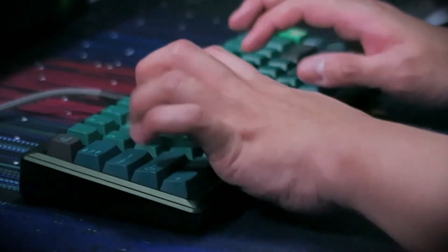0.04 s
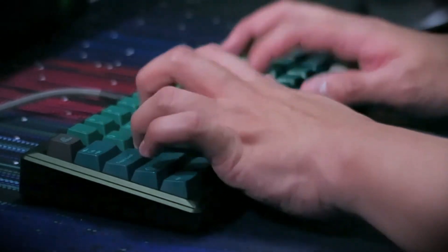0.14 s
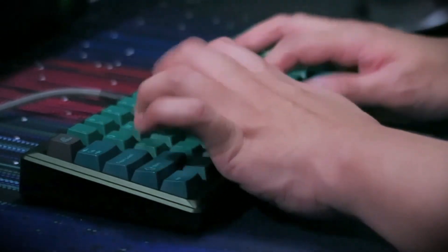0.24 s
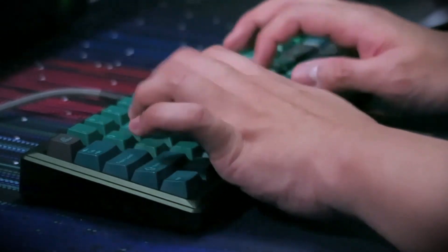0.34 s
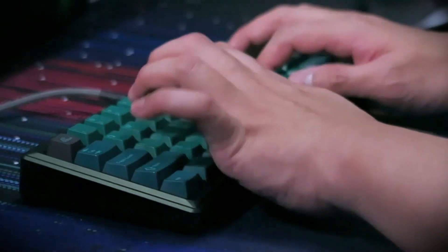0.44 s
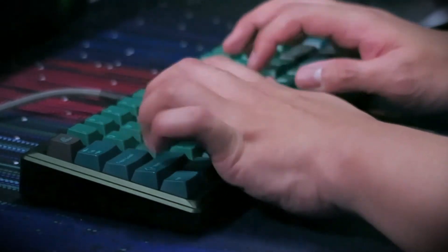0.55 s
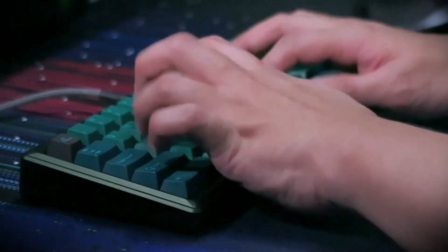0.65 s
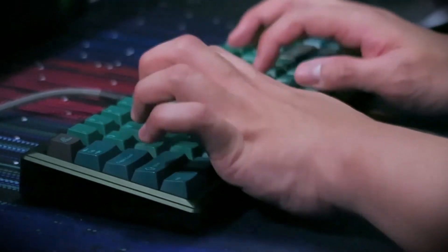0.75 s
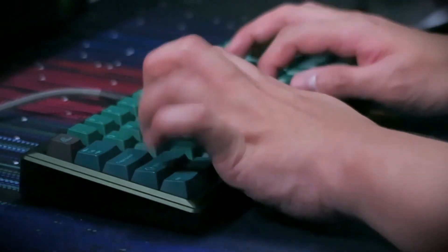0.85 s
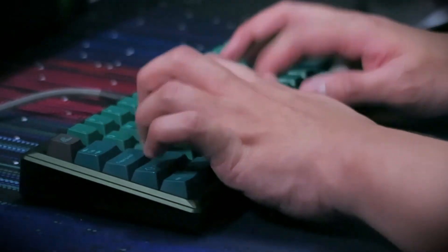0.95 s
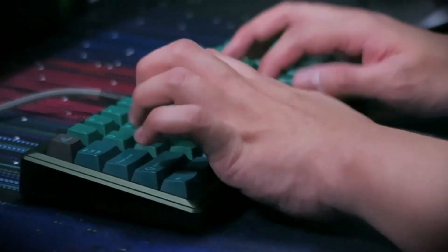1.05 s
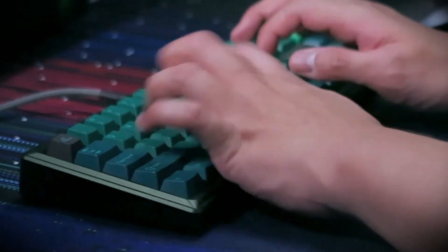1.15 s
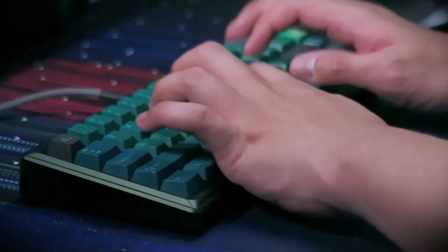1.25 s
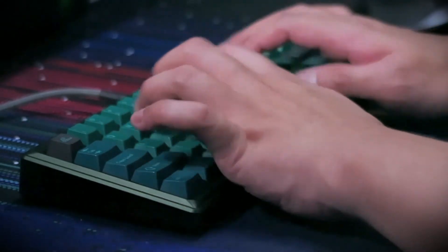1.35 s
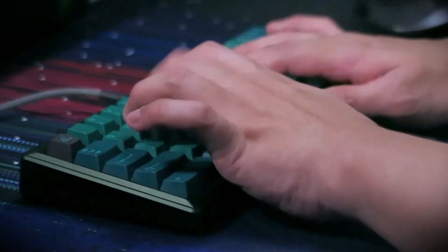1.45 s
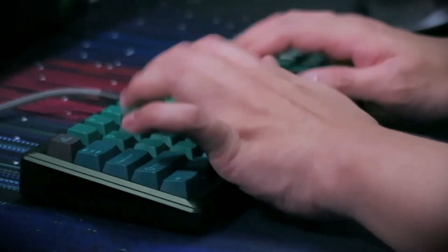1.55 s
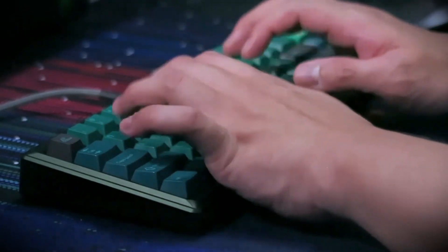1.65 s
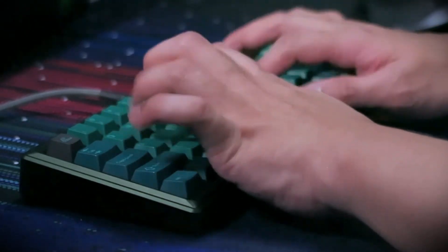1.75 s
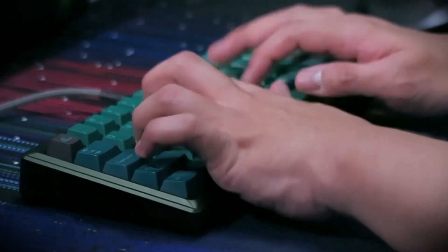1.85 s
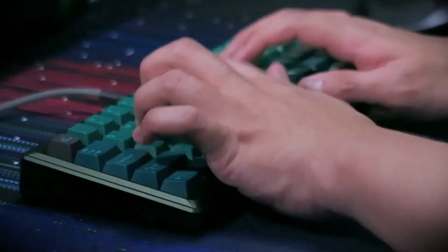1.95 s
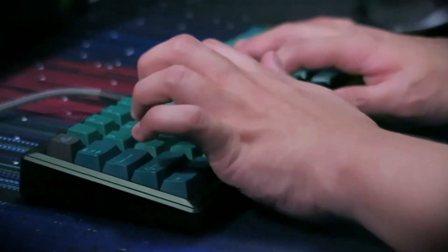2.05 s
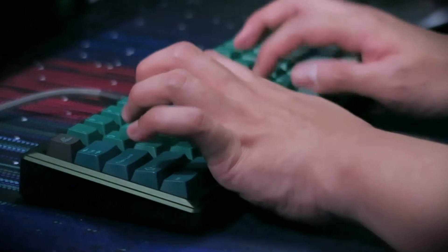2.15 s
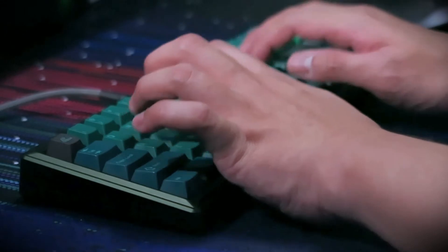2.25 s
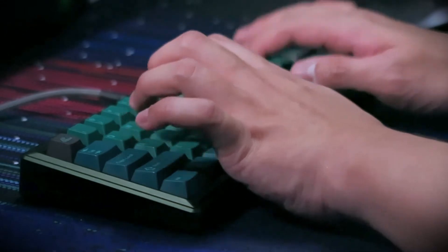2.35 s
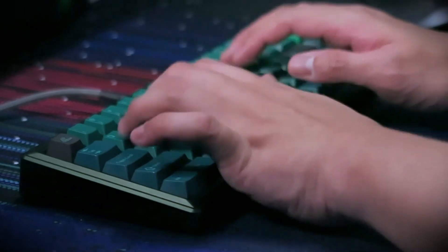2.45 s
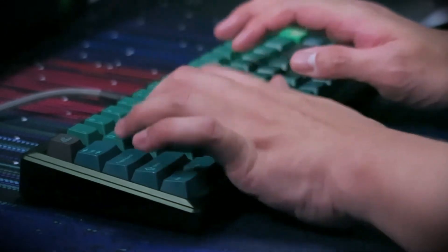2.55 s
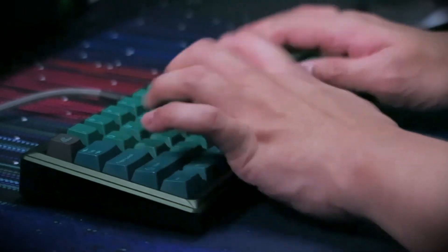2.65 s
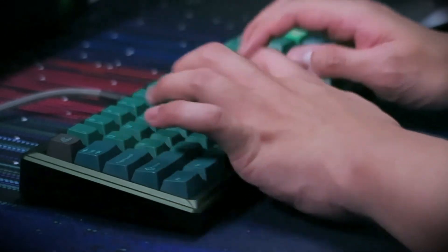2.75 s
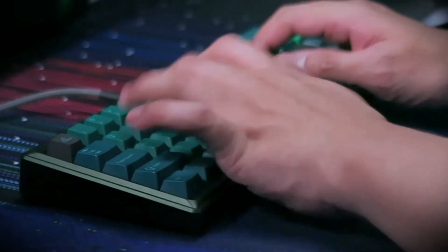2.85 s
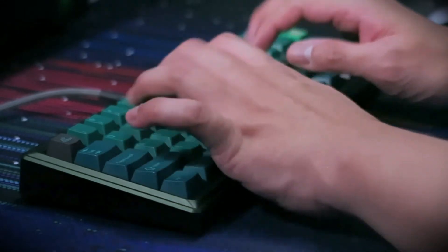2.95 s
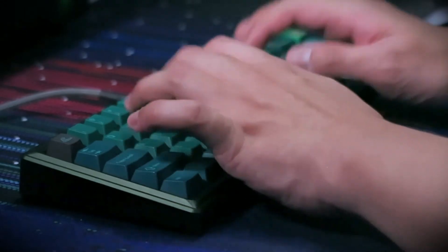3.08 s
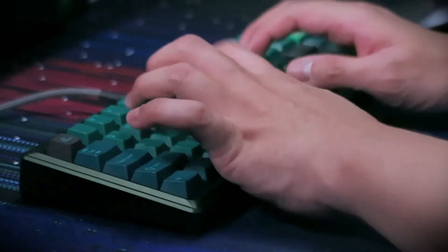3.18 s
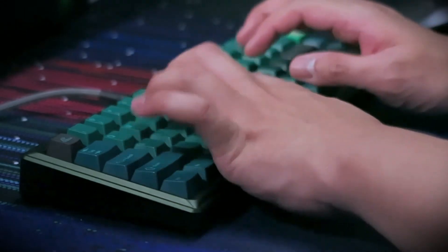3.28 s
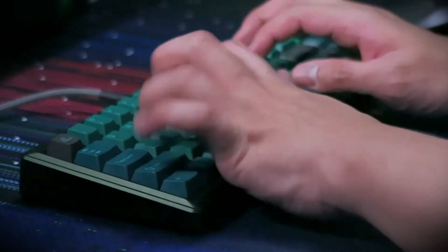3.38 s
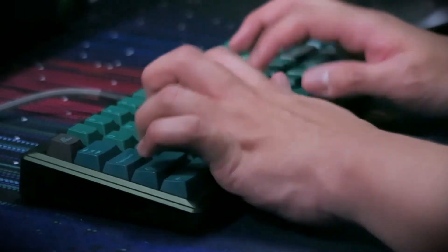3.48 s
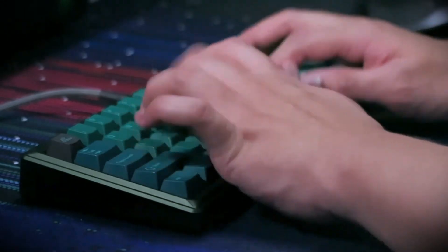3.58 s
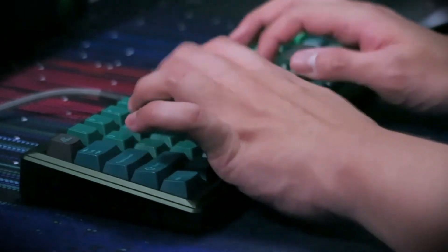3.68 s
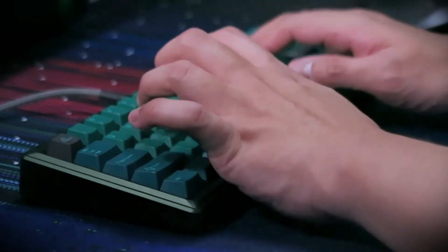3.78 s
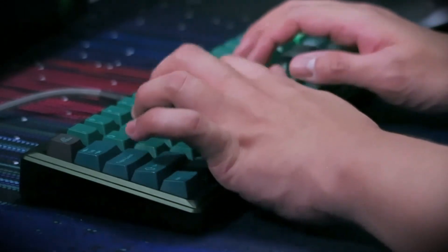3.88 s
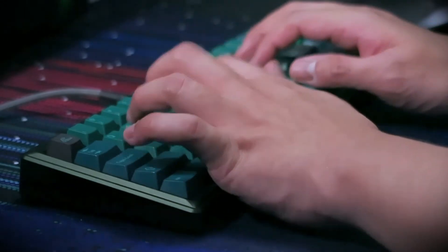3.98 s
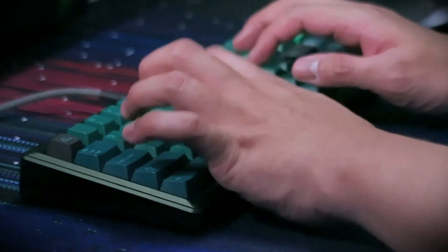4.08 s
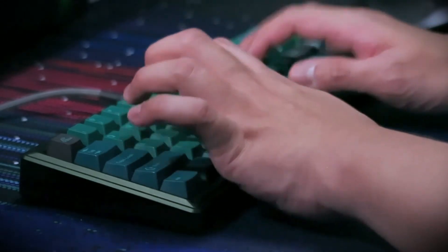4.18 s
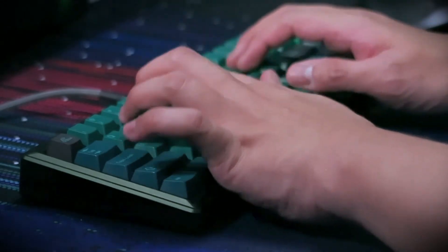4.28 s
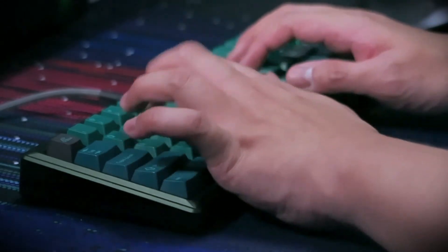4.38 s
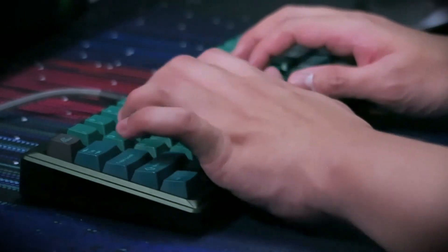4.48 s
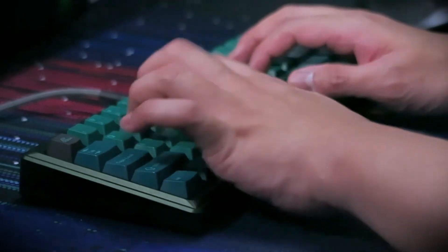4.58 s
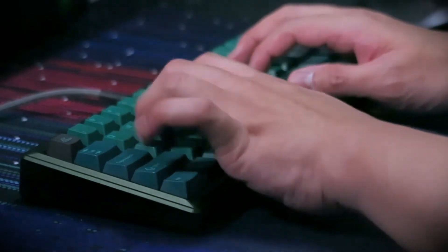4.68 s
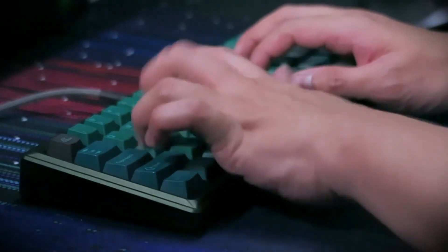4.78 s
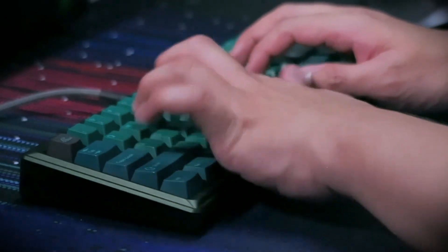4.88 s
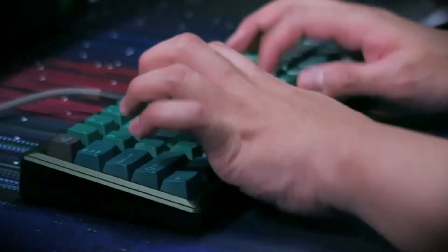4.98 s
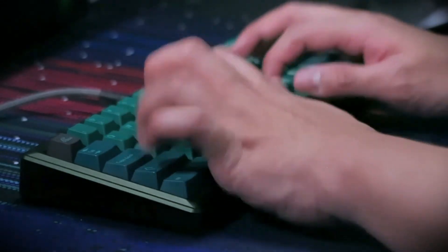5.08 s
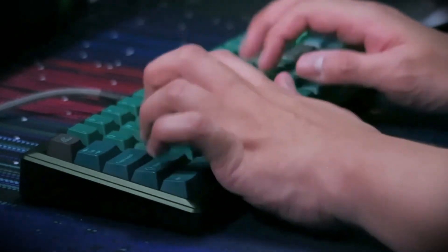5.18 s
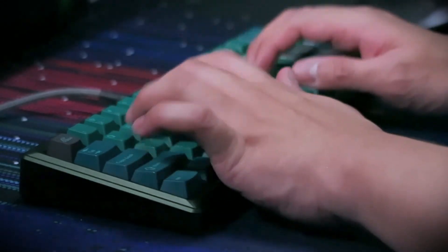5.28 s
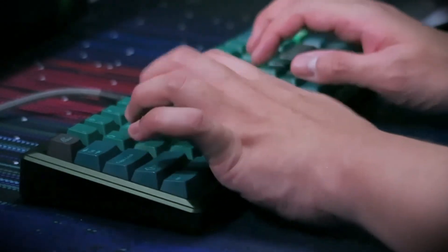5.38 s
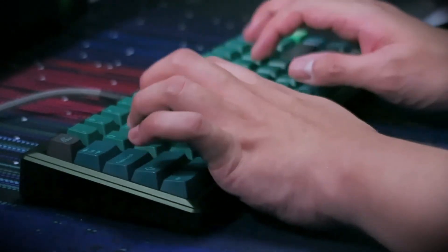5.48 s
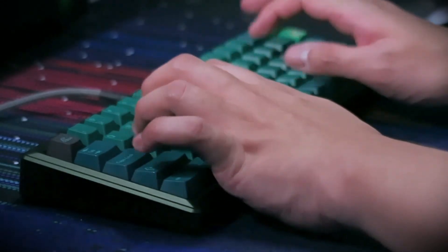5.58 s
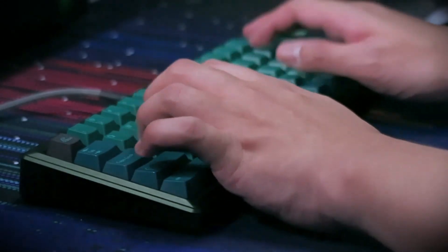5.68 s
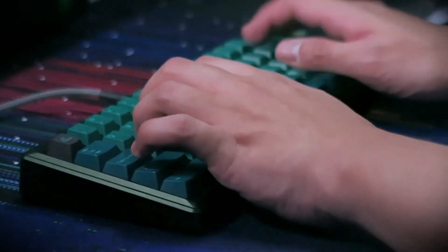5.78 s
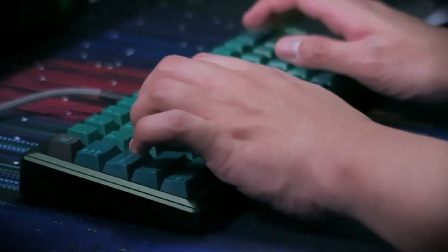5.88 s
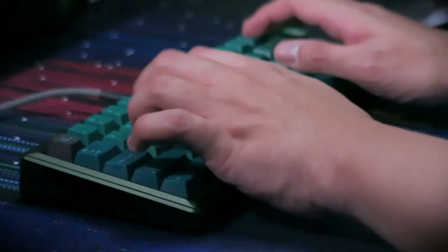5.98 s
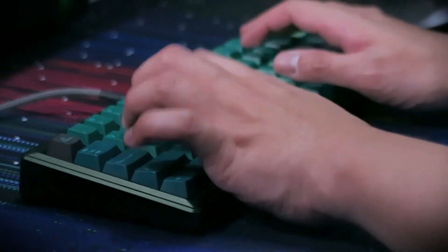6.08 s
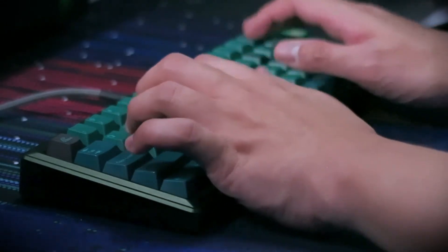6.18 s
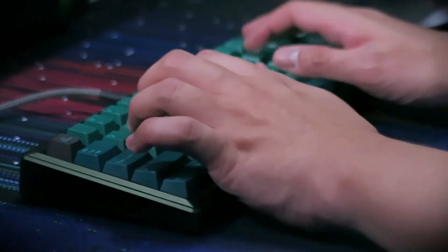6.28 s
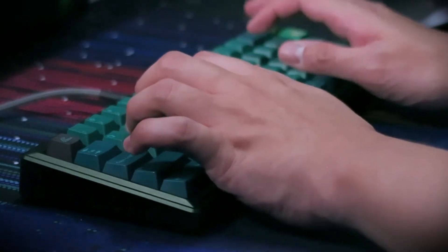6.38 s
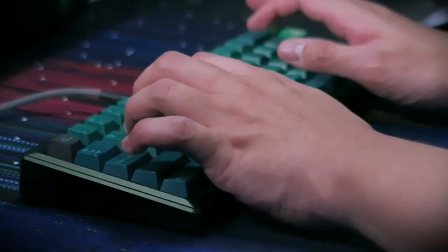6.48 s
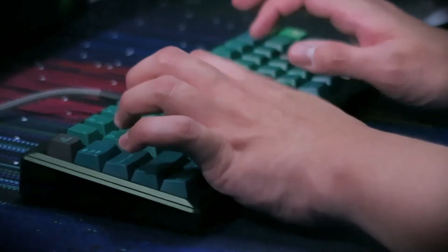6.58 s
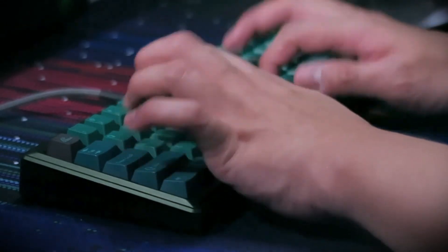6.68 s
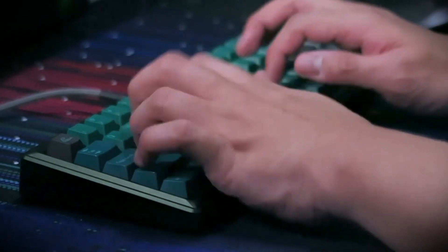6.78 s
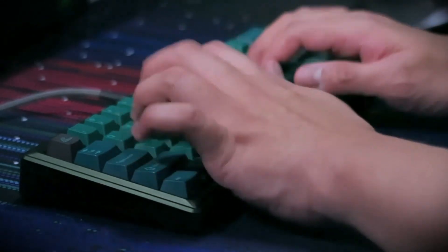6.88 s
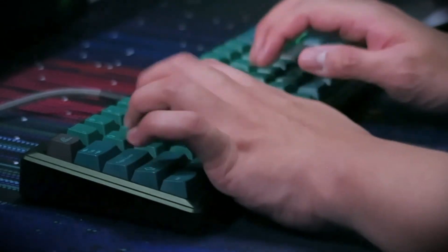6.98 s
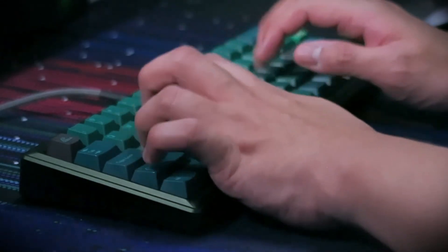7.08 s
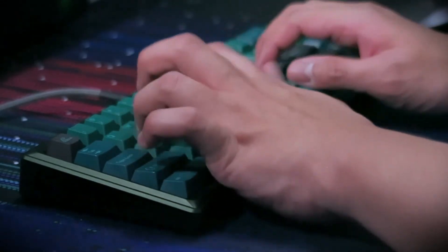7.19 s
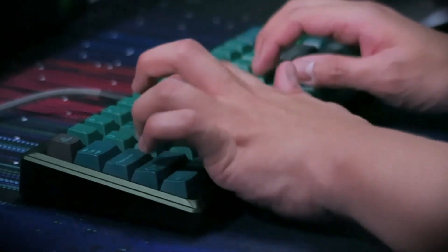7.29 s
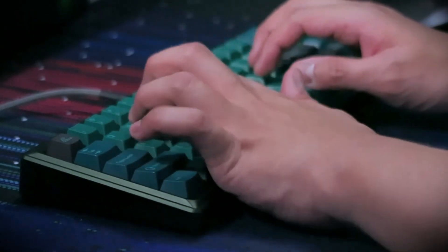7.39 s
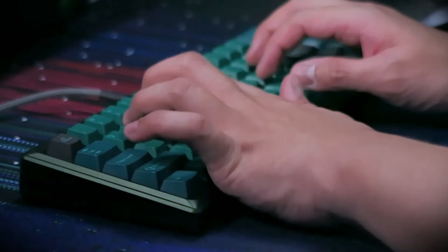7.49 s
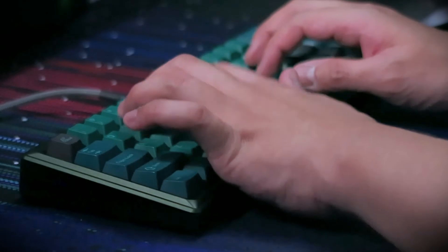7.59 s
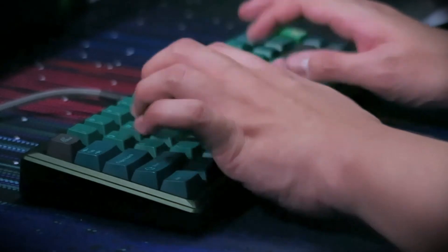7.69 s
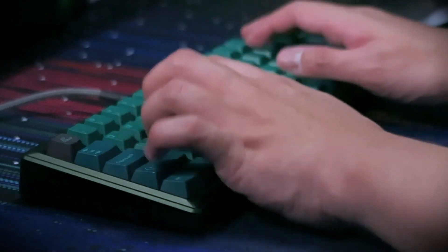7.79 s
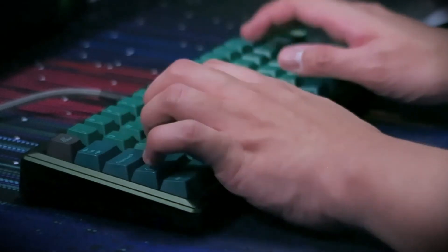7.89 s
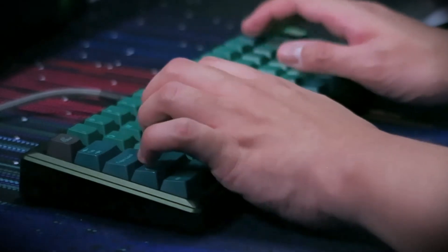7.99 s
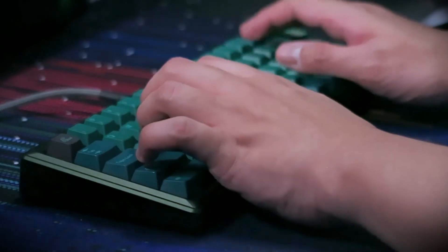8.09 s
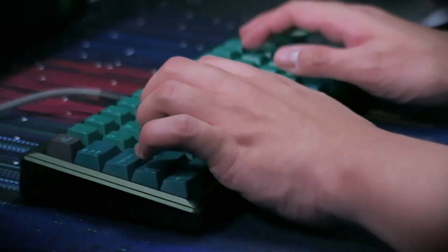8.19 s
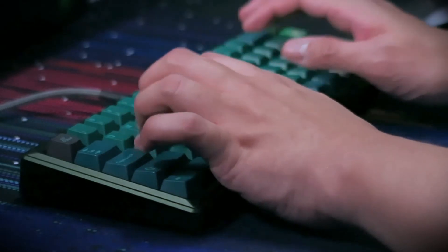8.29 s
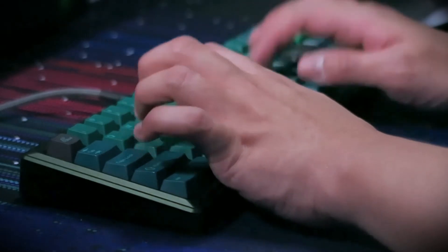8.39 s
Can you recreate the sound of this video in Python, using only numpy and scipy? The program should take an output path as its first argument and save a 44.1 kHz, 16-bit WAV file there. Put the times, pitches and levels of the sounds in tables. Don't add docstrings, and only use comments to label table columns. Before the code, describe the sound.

Quick hands type on a compact keyboard on a desk mat, each stroke a short, dry, bright clack with tiny rattles and slight desk thud. The long thumb bar sounds hollower. After a steady flurry, a wide key is tapped several times, a short burst returns, then sparse taps, a soft scuff and a final clack. Low fan hum and short room reflections stay faint behind.

```python
import sys
import numpy as np
from scipy import signal
from scipy.fft import rfft, irfft
from scipy.io import wavfile
from scipy.ndimage import uniform_filter1d

SR = 44100
rng = np.random.default_rng(int(sys.argv[2]) if len(sys.argv) > 2 else 0)


def unload_audio(sound):
    columns = np.transpose(np.atleast_2d(sound))
    steps = np.round(np.clip(columns, -1, 1) * 32767)
    wavfile.write(sys.argv[1], SR, steps.astype(np.int16))


def invert_db(level):
    return 10 ** (np.asarray(level, dtype=float) / 20)


N = 372204

# pitch_hz, level_db
STEM_COLOUR = [(3200, -21.5), (4200, -1.5), (5000, -0.5), (6500, -2.5), (7600, -4), (8800, -4.5),
               (10800, -1), (12500, -4.5), (14200, -17), (15400, -15.5), (16800, -33.5)]
STEM_T60_S = 0.0051
CAP_RADIATES_HZ, BOARD_RADIATES_HZ = 1876, 1260


def firm_contacts():
    # start_s, cap_db, cap_hz, stem_db re cap
    letters = [(.2272, -21, 2460, -5), (.3144, -22.5, 2860, -4), (.4444, -21, 2250, -13.5),
               (.5434, -18.5, 2400, -4), (.6602, -19, 2680, -1.5), (.8535, -20, 2620, -10.5),
               (.918, -19, 2330, -13), (1.0163, -25.5, 2580, 0), (1.2365, -21.5, 2720, -8),
               (1.4707, -24.5, 2620, -13.5), (1.878, -20.5, 2400, -13.5), (2.2507, -20.5, 2720, -11),
               (2.6828, -23.5, 2700, -10.5), (2.851, -26.5, 2940, -9.5), (3.307, -21.5, 2870, -11),
               (3.4685, -19, 2280, -11.5), (3.5731, -20.5, 2480, -1), (3.6358, -20.5, 2710, -4),
               (3.781, -21.5, 2740, -4.5), (3.9094, -23, 2600, -4), (4.229, -19, 2650, -5.5),
               (4.775, -22.5, 2300, -13), (4.9003, -16, 2510, -9.5), (5.0631, -24, 2670, -7),
               (5.1511, -15, 2270, -14.5), (5.2675, -24, 2955, -10.5), (6.7311, -19, 2890, -8.5),
               (6.9017, -22.5, 2820, -9.5), (6.9745, -25.5, 2600, -12.5)]
    # start_s, cap_db, cap_hz, stem_db re cap
    braced = [(.1374, -25, 2130, -15), (1.3292, -20, 2590, -4.5), (1.3827, -36.5, 2380, -9),
              (1.6482, -20.5, 2540, -11), (1.771, -18.5, 2420, -6), (1.8378, -16.5, 2330, -14),
              (1.928, -36.5, 2280, -20.5), (2.042, -25, 2720, -9), (2.3935, -28.5, 2760, -12),
              (2.9004, -22.5, 2650, -11.5), (3.0876, -34.5, 2480, -17), (3.1394, -21, 2530, -10.5),
              (4.3024, -18.5, 2770, -7.5), (4.355, -30, 2370, -13), (4.4358, -34.5, 2720, -8),
              (4.5104, -34.5, 2700, -9.5), (4.9646, -34, 2520, -12), (5.2222, -34, 2050, -10.5),
              (5.3248, -17, 2580, -14), (6.817, -14, 2280, -15), (7.025, -27.5, 2450, -34),
              (7.1432, -37.5, 2100, -11), (7.1566, -24.5, 2740, -6), (7.5185, -25, 2400, -13.5),
              (7.623, -37.5, 2210, -18), (7.6676, -38, 2265, -10.5), (8.4321, -23.5, 3030, -4)]
    # start_s, cap_db, cap_hz, stem_db re cap
    thumb_bar = [(.0363, -20.5, 2500, -12.5), (.414, -24.5, 2440, -13.5), (.7452, -21, 2310, -13),
                 (1.1146, -20, 2430, -17), (2.17, -17, 2600, -13.5), (2.7394, -20.5, 2670, -5),
                 (3.2063, -17.5, 2500, -14), (4.113, -24.5, 2400, -16.5), (6.6318, -16.5, 2450, -11),
                 (7.0378, -19, 2430, -13)]
    # start_s, cap_db, cap_hz, stem_db re cap
    corner = [(5.696, -21.5, 2860, 4), (5.827, -25, 2740, -2.5), (5.8903, -40, 2950, -2),
              (5.9582, -26, 2770, -2.5), (6.11, -40, 2950, -10), (6.1214, -28.5, 1920, -18),
              (6.1588, -30.5, 2730, -3), (6.1802, -34.5, 2800, 2), (6.2949, -30.5, 2650, -5.5),
              (7.8089, -23, 2650, 0), (7.9406, -29.5, 2680, -4.5), (8.187, -30.5, 2620, -4.5)]
    # start_s, cap_db, cap_hz, stem_db re cap
    snaps = [(.382, -38.5, 2600, -6), (.5182, -37.5, 2240, -9.5), (.7226, -35, 2080, -6),
             (1.5682, -34, 2480, -5.5), (1.7108, -25, 2660, -14.5), (1.9601, -32.5, 2540, -9.5),
             (2.6414, -34.5, 2300, -6.5), (2.811, -37, 2180, -12), (2.9248, -43, 2910, -16),
             (3.3785, -31, 2550, -5), (3.7081, -35.5, 2800, -6), (4.6366, -32.5, 2370, -10),
             (4.702, -35, 2520, -37), (4.8027, -39, 2300, -5), (5.1332, -41, 2250, -10),
             (6.7983, -41, 2140, -10), (6.8826, -29.5, 2300, -18)]
    # start_s, cap_db, cap_hz
    soft_returns = [(0.612, -27, 2330), (.676, -33.5, 2320), (1.0057, -29, 2180), (2.149, -32.5, 2040),
                    (2.3101, -33.5, 2770), (2.46, -38, 2500), (2.5606, -29.5, 2630), (2.9633, -31.5, 2340),
                    (3.0474, -28, 2960), (3.121, -35.5, 2860), (3.1974, -36, 2240), (3.5465, -30.5, 2340),
                    (3.7335, -37.5, 2340), (3.9642, -34, 2550), (4.0339, -29, 2600), (4.1003, -32.5, 2320),
                    (4.576, -25.5, 2760), (4.5981, -33.5, 2620), (4.856, -32, 2300), (5.3974, -36, 2640)]
    # start_s, cap_db, case_db re cap, stem_db re cap
    slack = [(0.3117, -40, 6.5, 1.5), (0.738, -47.5, 7, 7), (1.104, -46, 4, 0.5), (1.831, -36.5, -4.5, -10),
             (2.1625, -54.5, 15, 11.5), (3.132, -53, 6, 7), (4.2964, -58, 20, 15),
             (4.4753, -24.5, -20, -14), (6.623, -64, 9.5, 18), (8.4252, -43, -0.5, -4)]
    returns = [(s, db, hz, -10.5) for s, db, hz in soft_returns]
    # contacts, case_db re cap
    kinds = [(letters, -18.5), (braced, -22.5), (thumb_bar, -6), (corner, 9.5), (snaps, -10), (returns, -15.5)]
    contacts = [(s, db, hz, case_db, stem_db) for rows, case_db in kinds for s, db, hz, stem_db in rows]
    contacts += [(s, db, 2650, case_db, stem_db) for s, db, case_db, stem_db in slack]
    return sorted(contacts)


def light_contacts():
    # start_s, cap_db
    landings = [(0.1207, -53), (0.2186, -45), (.4626, -55.5), (0.536, -56.5), (0.8451, -49), (.9084, -47.5),
                (1.0836, -41.5), (1.3146, -58), (1.5006, -54), (1.5179, -59), (1.635, -55), (1.764, -55),
                (2.029, -50), (2.1255, -42.5), (2.2689, -61), (2.3784, -49.5), (2.449, -53), (2.544, -57),
                (2.672, -51), (2.84, -47.5), (2.935, -48), (3.0333, -55),
                (3.5666, -42), (3.6296, -52), (3.7, -61), (4.221, -50), (4.418, -55), (4.622, -52),
                      (4.6915, -54), (4.737, -62), (4.75, -54), (4.8184, -58), (4.8959, -46), (5.2583, -60),
                      (5.687, -50), (5.82, -46.5), (5.95, -48), (6.1, -49), (6.281, -48), (6.724, -56),
                      (6.81, -53), (6.895, -47.5), (7.866, -44)]
    # start_s, cap_db, cap_hz
    rattles = [(0.3993, -40.5, 2420), (0.6255, -42, 2400), (.6511, -69, 2790), (1.4595, -45, 3030),
               (1.554, -46, 2390), (1.922, -44, 2930), (2.096, -39.5, 2300), (2.1387, -38.5, 2810),
               (2.4934, -43, 2600), (2.5148, -39.5, 2300), (2.5846, -49, 2880), (2.593, -53, 2480),
               (2.7357, -46, 2660), (2.89, -45, 2840), (2.993, -48.5, 2340), (3.1115, -51, 2610),
               (3.298, -45, 2800), (3.868, -41.5, 2860), (3.902, -50, 2760), (4.021, -47, 3080),
               (4.2, -54, 2440), (4.323, -51, 2750), (4.5653, -50, 2420), (5.051, -45.5, 3000),
                     (5.1448, -48, 2680), (5.3208, -40, 2930), (5.3373, -39.5, 2340), (5.7547, -44, 2860),
                     (6.027, -46.5, 2920), (6.2218, -41, 3180), (6.6184, -60, 2800), (6.9643, -44, 2750),
                     (6.981, -40, 2300), (6.9868, -42, 2640), (7.1486, -42, 2720), (7.261, -60, 2890),
                     (7.6797, -45.5, 2690), (7.927, -49, 2690), (8.0113, -45, 3020)]
    # start_s, cap_db, cap_hz
    nudges = [(0.4364, -43, 2690), (1.001, -65, 2280), (1.2074, -45, 2600), (1.7946, -47, 3200),
              (1.956, -39, 2450), (2.4687, -38, 2480), (3.7723, -53, 2850), (3.8556, -40.5, 2360),
              (4.633, -48, 2900), (4.833, -48, 2310), (5.318, -44, 2960), (5.495, -48, 2820),
              (6.814, -42, 2170), (6.8737, -64, 2700), (7.185, -38.5, 2220), (7.284, -50, 2480),
              (7.317, -60.5, 2470), (7.325, -43.5, 2420), (7.5927, -54, 2880), (8.0538, -51.5, 2430),
              (8.074, -52, 1910), (8.094, -44, 2390)]
    contacts = [(s, db, 2720, -2.7) for s, db in landings]
    contacts += [(s, db, hz, -9) for s, db, hz in rattles]
    contacts += [(s, db, hz, -23.5) for s, db, hz in nudges]
    return sorted(contacts)


def all_contacts(firm):
    touches = []
    for s, db, hz, stem_db in light_contacts():
        last_blow = [blow for blow in firm if blow[0] < s][-1]
        touches.append((s, db, hz, 3 + last_blow[3], stem_db))
    return firm + touches


FIRM = firm_contacts()
EVERY = all_contacts(FIRM)


def evened(x):
    return x / np.sqrt(np.mean(x ** 2) + 1e-30)


def unit(x):
    return x / (np.linalg.norm(x, axis=-1, keepdims=True) + 1e-15)


def read(points, hz):
    f, value = np.transpose(points)
    return np.interp(np.log(hz + 1), np.log(f + 1), value)


def lay(starts, sounds, lead=0):
    size = sounds.shape[1]
    at = np.round(starts * SR).astype(int)[:, None] + np.arange(size)
    return np.bincount(at.ravel(), sounds.ravel(), N + 2 * size)[lead:lead + N]


def high(x, hz):
    return signal.sosfilt(signal.butter(4, hz, "highpass", fs=SR, output="sos"), x)


def air():
    # pitch_hz, level_db per Hz
    air_colour = [(25, -40), (50, -9), (90, -10), (200, 0), (370, -2), (550, -8), (900, -15), (2000, -14.5),
                  (3200, -28.5), (5000, -36), (9000, -39), (15500, -34.5), (16100, -51.5)]
    hz = np.fft.rfftfreq(N, 1 / SR)
    spectrum = rfft(rng.standard_normal(N)) * invert_db(read(air_colour, hz))
    return invert_db(-72) * evened(irfft(spectrum, N))


def hum():
    # pitch_hz, steady_db, waver_db, waver_width_hz
    fan_lines = [
        (60.4, -97, -103, 6.6),
        (120.7, -82.5, -82, 13),
        (240.7, -70, -74, 33),
        (354, -86.5, -87, 9.4),
    ]
    t, out = np.arange(N) / SR, np.zeros(N)
    for hz, steady_db, waver_db, width_hz in fan_lines:
        r = np.exp(-np.pi * width_hz / SR)
        noise = rng.standard_normal(N) + 1j * rng.standard_normal(N)
        wander = signal.lfilter([1], [1, -2 * r, r * r], noise)
        wander /= np.sqrt(np.mean(abs(wander) ** 2))
        carrier = np.exp(2j * np.pi * (hz * t + rng.random()))
        line = (invert_db(steady_db) + invert_db(waver_db) * wander) * carrier
        out += np.sqrt(2) * line.real
    return out


def fidget():
    # start_s, level_db
    nail_ticks = [(0.02, -48), (.106, -56), (.481, -66), (6.935, -62), (7.122, -59), (7.198, -56),
                  (7.238, -63), (7.279, -66), (7.338, -72), (8.252, -65.5)]
    ticks_per_blow, tick_db, skin_db = 7.0, -72, -82.5
    blows = lay(np.array(FIRM)[:, 0], np.ones((len(FIRM), 1)))
    busy = uniform_filter1d(blows, size=SR // 4, mode="reflect")
    falls = rng.random(N) < ticks_per_blow * (busy - 8 / SR)
    size = invert_db(tick_db + 4.0 * rng.exponential(1, N)) * falls
    s, db = np.transpose(nail_ticks)
    size += lay(s, invert_db(db)[:, None])
    shape = signal.lfilter([1], [1, -invert_db(-60 / (STEM_T60_S * SR))], size)
    skin = invert_db(skin_db) * np.sqrt(abs(busy) * SR / 10)
    grit = rng.standard_normal(N) * (shape + skin)
    colour = invert_db(read(STEM_COLOUR, np.fft.rfftfreq(N, 1 / SR)) / 2)
    return high(irfft(rfft(grit) * colour, N), CAP_RADIATES_HZ)


def rings(hz, db, t60, t, scatter, scatter_db):
    out = np.zeros((len(EVERY), len(t)))
    luck = rng.standard_normal((len(EVERY), len(db), 3))
    for k in range(len(db)):
        f = (hz[k] * (1 + scatter * luck[:, k, 0]))[:, None]
        height = invert_db(db[k] + scatter_db * luck[:, k, 1])[:, None]
        phase = .4 * luck[:, k, 2:]
        out += height * invert_db(-60 * t / t60[k]) * np.sin(2 * np.pi * f * t + phase)
    return unit(out)


def crack(t):
    burst = rng.standard_normal((len(EVERY), len(t))) * invert_db(-60 * t / STEM_T60_S)
    hz = np.abs(np.fft.fftfreq(len(t), 1 / SR))
    gain = np.log(invert_db(read(STEM_COLOUR, hz)))
    causal = np.exp(gain - 1j * signal.hilbert(gain).imag)[:len(t) // 2 + 1]
    return unit(irfft(rfft(burst) * causal, len(t)))


def own_rings(s, t):
    # start_s, top_face_db, top_face_hz, skirt_db, skirt_hz
    hard = [(0.0363, -35.5, 2190.0, -22.5, 4230), (0.3144, -30.5, 2390, -19, 3230),
            (0.5433, -27, 2170, -18.5, 3020), (0.66, -26, 2060, -27, 3520),
            (0.7455, -19.5, 2390, -25, 3740), (0.8537, -28, 2160, -24, 3740.0),
            (0.9178, -27.5, 1830, -53, 3230.0), (1.1146, -22.0, 2340, -24, 3840),
            (1.2365, -25, 2020.0, -35, 4000.0), (1.3292, -26.5, 1750, -20.5, 3260),
            (1.4706, -27, 2320, -23.5, 3120.0), (1.6482, -27, 2230, -33, 3120),
            (1.7707, -22, 2160.0, -28, 4260), (1.8376, -16, 1880, -44, 3630.0),
            (1.878, -18.5, 2420, -33.5, 3050), (2.1699, -20.5, 1840, -25.5, 3820),
            (2.2504, -24.5, 2120, -27, 3290.0), (2.6826, -20, 2470, -22, 3230),
            (2.7394, -42, 1970, -20, 4680.0), (2.9005, -32.5, 2170.0, -26, 4800.0),
            (3.1393, -27, 2220.0, -29.5, 3250), (3.206, -11.5, 2340, -27.0, 3670),
            (3.3069, -18, 2006, -35, 3030), (3.4685, -31.5, 2080, -35, 3600),
            (3.5732, -24.5, 2170, -22.5, 3680), (3.6359, -32, 2320, -28.5, 3260),
            (3.7811, -40, 2510, -24, 3440), (3.9092, -25, 2290.0, -23, 3150.0),
            (4.2287, -33, 2120, -36, 3460), (4.3025, -33, 2240, -20.5, 3200),
            (4.9004, -32, 2110, -31.5, 3400), (5.0633, -41, 2120, -21, 3730),
            (5.1511, -21.5, 2160, -38, 4040.0), (5.3249, -12.5, 2230, -28, 3030.0),
            (6.632, -24, 2150, -26, 3810), (6.7311, -30, 2540, -31, 3900), (6.8168, -14, 2220, -40, 4020.0),
            (6.9016, -19, 2120, -22, 3240), (7.0381, -27, 2150, -25, 3750),
            (8.4319, -31.0, 2200.0, -29, 5170)]
    softer = [(0.1375, -22.5, 2240, -56, 3290.0), (0.2274, -28.5, 2130, -36, 3300),
              (0.4138, -32, 2170, -32, 3730), (0.4444, -15, 2250, -32.5, 3700),
              (0.6123, -28, 1910, -40.5, 3650), (1.006, -35, 2240, -46, 3630.0),
              (1.0162, -20, 2030, -30.5, 3700), (1.7102, -28, 2160, -42, 3880),
              (2.0421, -43.5, 2300, -31, 3180), (2.3935, -39, 1770, -36.5, 3560),
              (2.5607, -36, 1770, -33.0, 3040), (2.8508, -34, 2200, -27.5, 3170.0),
              (3.0471, -55, 2300.0, -45, 3280.0), (3.5463, -26, 1840, -45, 3680),
              (4.034, -35, 2330, -34, 3140), (4.1133, -23.5, 2130, -30.5, 3650),
              (4.3552, -42, 2120, -39, 3080.0), (4.4753, -25.5, 2200, -38, 3200),
              (4.576, -32.0, 2030.0, -32.5, 3070), (4.7748, -25.5, 2100, -40, 3230),
              (4.8561, -18.5, 2120, -23.5, 2850), (5.2674, -30, 2160, -36, 3200),
              (6.1217, -22, 2250, -34, 3870), (6.8826, -37, 2100, -56, 3330.0),
              (6.9745, -37, 2200.0, -36, 3230), (7.0248, -35, 2100, -27, 4610.0),
              (7.157, -28, 2180, -28.0, 3200.0), (7.5189, -26.0, 2320, -62, 3830.0)]
    # start_s, level_db, pitch_hz
    stem_pings = [(0.2274, -31, 12200), (0.3144, -24, 10400), (0.4444, -26.5, 10700),
                  (0.5433, -19.5, 10800), (0.66, -32, 9050), (0.8537, -29, 11100), (0.9178, -32, 8980.0),
                  (1.0162, -43, 11100), (1.2365, -30.5, 10860), (1.3292, -24, 10920.0),
                  (1.4706, -29, 10500), (1.6482, -39, 9300), (1.7707, -21.5, 10900), (1.8376, -27, 11010.0),
                  (1.878, -24, 10400.0), (2.0421, -31.5, 10700), (2.2504, -23.5, 11020.0),
                  (2.6826, -29, 10650.0), (2.7394, -31, 10740.0), (3.0471, -26.5, 10300),
                  (3.1393, -30.5, 10640), (3.3069, -25, 11000), (3.4685, -32.0, 10900.0),
                  (3.5732, -35.5, 9700), (3.6359, -20, 10100), (3.7811, -18, 10970.0),
                  (3.9092, -26.5, 10500), (4.2287, -26, 11200), (4.3025, -26.5, 11500), (4.576, -30, 10900),
                  (4.9004, -28, 10900), (5.0633, -35.0, 11700), (5.1511, -26, 10400),
                  (5.2674, -41, 10910.0), (5.3249, -26, 12300), (6.632, -37, 13000.0), (6.7311, -23, 11000),
                  (6.8168, -24, 10000), (6.9016, -26, 10490.0), (8.4319, -27, 10400)]
    top_faces = [row[:3] for row in hard + softer]
    skirts = [(row[0], *row[3:]) for row in hard + softer]
    out = np.zeros((len(s), len(t)))
    # rows, level_db re table, t60_s
    for rows, db, t60 in [(top_faces, -5.5, .012), (skirts, -2.5, 0.0082), (stem_pings, 0, .005)]:
        at, row_db, hz = np.array(rows).T[:, :, None]
        nearest = abs(at - s).argmin(axis=1)
        out[nearest] += invert_db(row_db + db - 60 * t / t60) * np.sin(2 * np.pi * hz * t)
    return out


def keys():
    # factor on cap pitch, level_db, t60_s
    cap_rings = [
        (0.839, -5, 0.0064),
        (0.951, 2.5, 0.0055),
        (1.08, 2, 0.0025),
        (1.24, -16.5, 0.0042),
    ]
    # pitch_hz, level_db, t60_s
    case_rings = [
        (1010, -8, .02),
        (1190, -1, .022),
        (1375, 0, .022),
        (1530, -5, .015),
    ]
    # from_s, to_s
    wide_spans = [
        (5.68, 6.3),
        (7.8, 8.2),
    ]
    # pitch_hz, level_db, t60_s
    wide_rings = [(1252, 5, 0.014), (1680, -2.5, 0.011), (2080, 2, 0.016), (2300, -26.5, 0.018),
                  (2907, -15, 0.01), (3360, 7.5, 0.0051), (4490, -13.5, 0.029), (5980, -8.5, 0.0054),
                  (12900, -9, 0.0072)]
    plate_hz, plate_db, plate_t60_s = 2135, -13, 0.013
    chatter_db, chatter_t60_s = -10.5, 0.028
    slide_db, slide_s = -26.5, 0.0065
    scattered_s = .0013

    s, cap_db, cap_hz, case_db, stem_db = np.array(EVERY).T
    level = invert_db(cap_db + 16.5)[:, None]
    t = np.arange(1200) / SR
    rise = 1 - np.exp(-t / .00015)
    factor, db, t60 = np.transpose(cap_rings)
    cap = rings(factor[:, None] * cap_hz, db, t60, t, .03, 2.5)
    plate = rings([plate_hz], [plate_db], [plate_t60_s], t, .015, 0)
    cap = rise * (cap + invert_db(plate_db) * plate)
    case = rise * rings(*np.transpose(case_rings), t, .012, 3.0)
    wide = sum((s > a) & (s < b) for a, b in wide_spans)[:, None]
    case_gain = invert_db(case_db - 0.5)[:, None] * (1 - wide)
    stem_gain = invert_db(stem_db)[:, None]
    blow = unit(high(cap, CAP_RADIATES_HZ)) + case_gain * unit(case) + stem_gain * crack(t)
    wide_ring = rise * rings(*np.transpose(wide_rings), t, .008, 1.5)
    blow += wide * (wide_ring - 0.8 * blow)
    special = rise * own_rings(s, t) / level
    blow = blow * np.where(special.any(axis=1), .7, 1)[:, None] + special

    blur = np.exp(-t / scattered_s)
    blurred = unit(high(cap * blur, CAP_RADIATES_HZ)) + case_gain * unit(case * blur)
    blurred += stem_gain * unit(crack(t) * blur ** 10)
    blurred += wide * (unit(wide_ring * np.sqrt(blur)) - blurred) / 2 + 1.3 * special * np.sqrt(blur)

    lead = 600
    u = (np.arange(2400) - lead) / SR
    grit = rng.standard_normal((len(s), len(u))) * rng.exponential(1, (len(s), len(u))) ** 2
    light = np.clip((-27.0 - cap_db) / 15, 0, 1)[:, None]
    shaking = (u > .0006) * invert_db(-60 * np.maximum(u, 0) / chatter_t60_s)
    chatter = unit(grit * shaking) * invert_db(chatter_db + 5.9 * light)
    scraping = (u < 0) * np.exp(np.minimum(u, 0) / slide_s)
    slide = unit(grit * scraping) * invert_db(slide_db)
    rattle = lay(s, signal.fftconvolve(chatter + slide, blurred, axes=1) * level, lead=lead)
    blows = np.array([lay(s, blow * level), lay(s, blurred * level)])
    return high(blows + rattle, BOARD_RADIATES_HZ)


def desk():
    # start_s, level_db
    second_thuds = [(1.336, -57), (1.837, -74), (2.256, -77), (3.79, -62), (4.239, -69), (5.701, -53.5),
                    (6.818, -68)]
    thud_hz, t60_s, usual_db, rise_s = 92, 0.12, -39, .008
    usual = [(b[0], b[1] + usual_db - 6.0) for b in FIRM]
    s, db = np.transpose(second_thuds + usual)
    t = np.arange(6000) / SR
    pitch = thud_hz * rng.uniform(1.0, 1.2, (len(s), 1))
    envelope = (1 - np.exp(-t / rise_s)) ** 2 * invert_db(-60 * t / t60_s)
    thud = envelope * np.sin(2 * np.pi * pitch * t)
    return lay(s, thud * invert_db(db + 9.0)[:, None])


def room(x):
    # pitch_hz, level_db
    returned = [(1100, 1.5), (2150, -0.5), (3200, -3), (4700, -1), (6000, -1.9)]
    # pitch_hz, t60_s
    decay = [
        (700, 0.6),
        (2000, 0.2),
        (5000, 0.28),
        (14000, 0.15),
    ]
    hz, t, z = signal.stft(rng.standard_normal((3, SR // 2)), SR, nperseg=256)
    fall_db = read(returned, hz)[:, None] - 60 * t / read(decay, hz)[:, None]
    tails = signal.istft(z * invert_db(fall_db), SR, nperseg=256)[1]
    onset = np.clip(np.arange(tails.shape[1]) / SR / .012 - .3, 0, 1)
    tails = unit(tails * onset)
    turn = 2 * np.pi * 3.6 * np.arange(N) / SR
    shares = np.sqrt(2 / 3) * np.cos(turn + np.pi / 3 * np.arange(3)[:, None])
    return signal.fftconvolve(x * shares, tails, axes=1).sum(0)[:N]


def swell():
    centre_s, half_s, level_db, low_hz, high_hz = 0.54, 0.43, -73.5, 261.5, 396
    band = signal.butter(2, [low_hz, high_hz], "bandpass", fs=SR, output="sos")
    rumble = evened(signal.sosfilt(band, rng.standard_normal(N)))
    return invert_db(level_db) * rumble * np.exp(-((np.arange(N) / SR - centre_s) / half_s) ** 2)


def knock():
    start_s, level_db, hz, t60_s = 8.073, -48.5, 970, 0.13
    t = np.arange(5000) / SR
    band = signal.butter(2, [hz / 1.5, hz * 1.5], "bandpass", fs=SR)
    grit = rng.standard_normal(len(t)) * rng.exponential(1, len(t))
    burst = evened(signal.lfilter(*band, grit)) * invert_db(-60 * t / t60_s)
    return lay(np.array([start_s]), invert_db(level_db) * burst[None])


def scene():
    close, scattered = keys() + knock()
    walls = invert_db(-22) * room(scattered)
    return (air() + hum() + fidget() + close + walls + desk() + swell())[None]


def top_cut(x):
    return signal.sosfilt(signal.butter(12, 17140, fs=SR, output="sos"), x)


def record(dry):
    limited = signal.sosfilt(signal.butter(12, 16500, fs=SR, output="sos"), dry)
    return top_cut(limited)


dry = scene()
out = record(dry)
unload_audio(out)
```